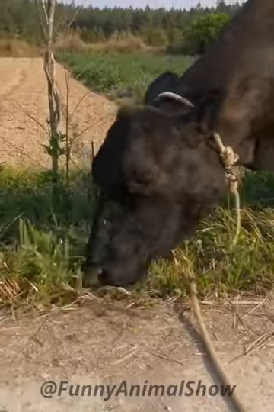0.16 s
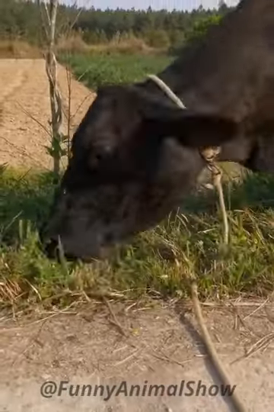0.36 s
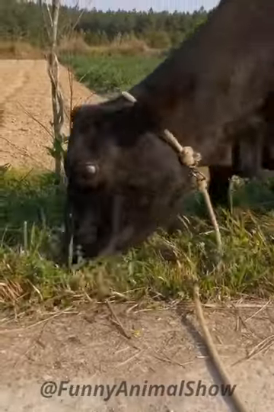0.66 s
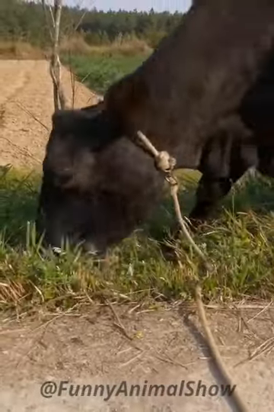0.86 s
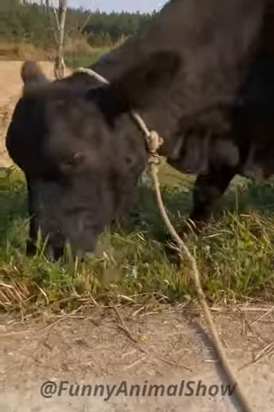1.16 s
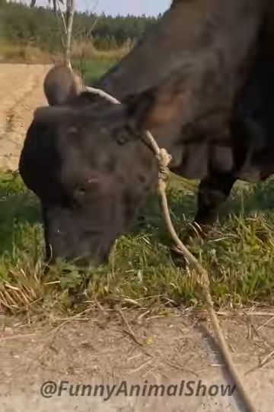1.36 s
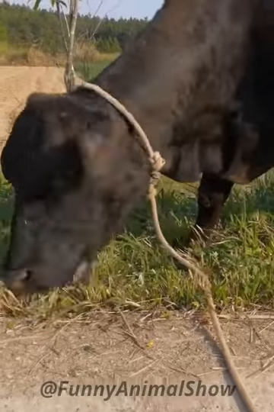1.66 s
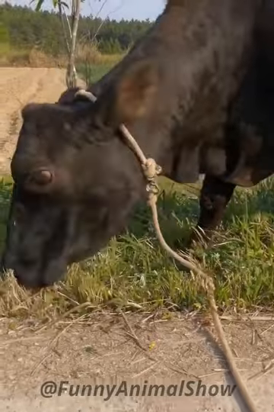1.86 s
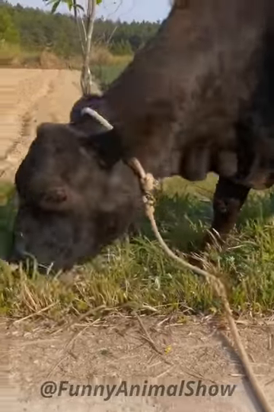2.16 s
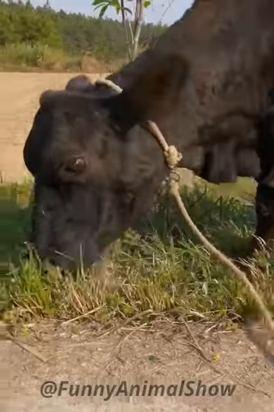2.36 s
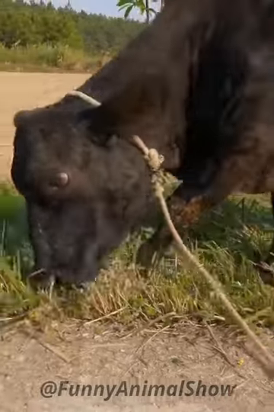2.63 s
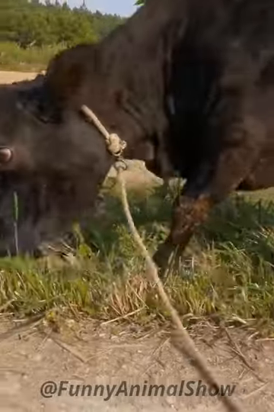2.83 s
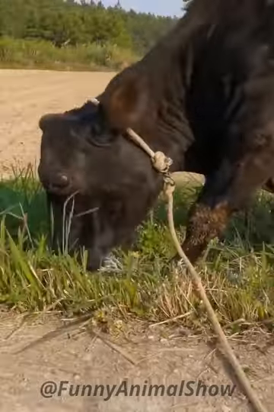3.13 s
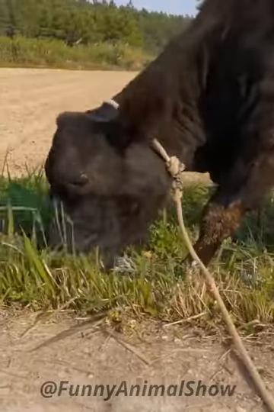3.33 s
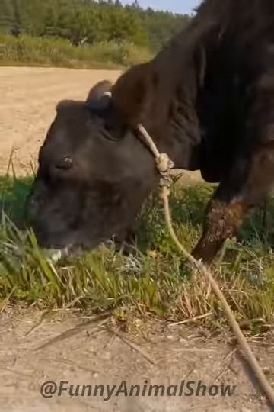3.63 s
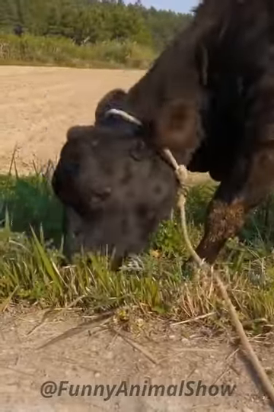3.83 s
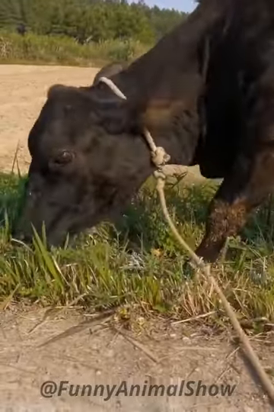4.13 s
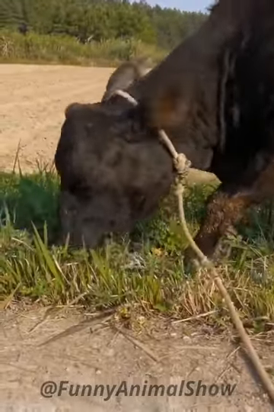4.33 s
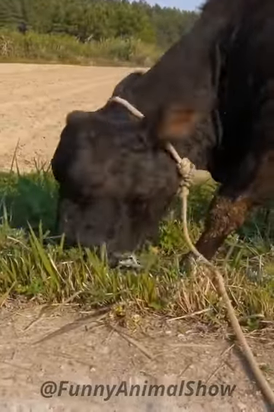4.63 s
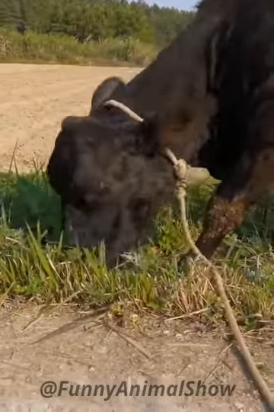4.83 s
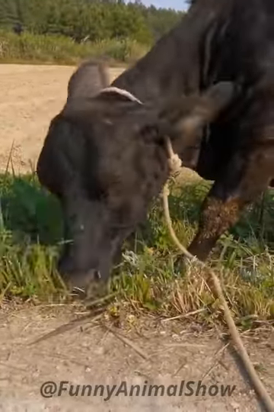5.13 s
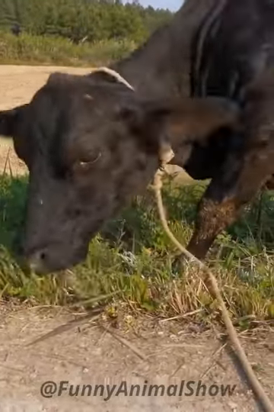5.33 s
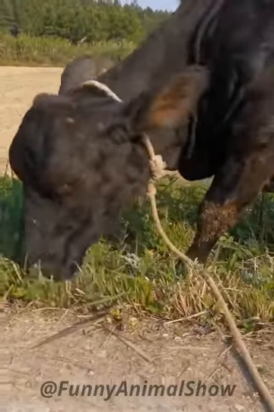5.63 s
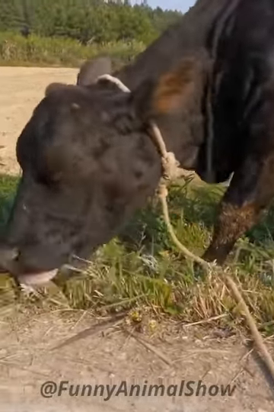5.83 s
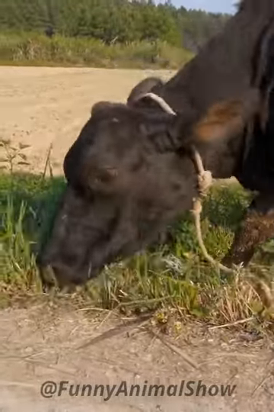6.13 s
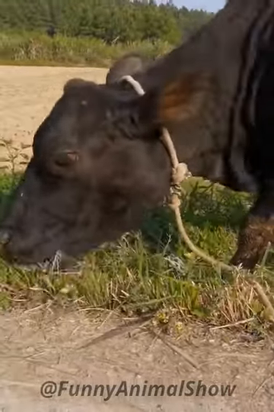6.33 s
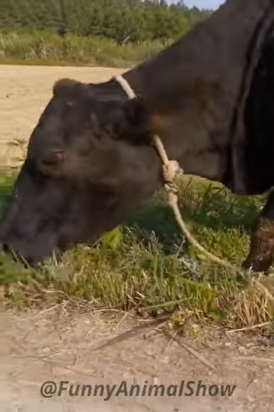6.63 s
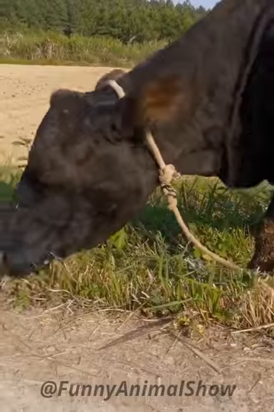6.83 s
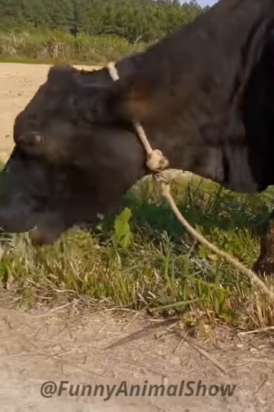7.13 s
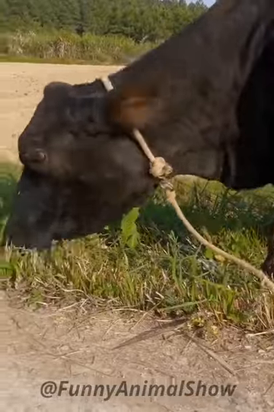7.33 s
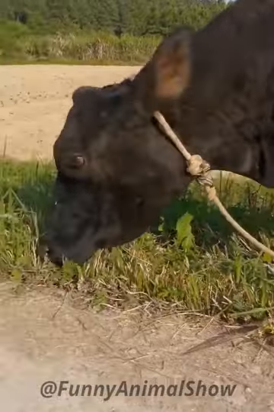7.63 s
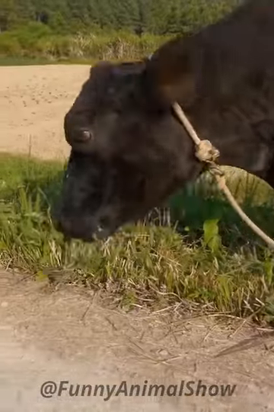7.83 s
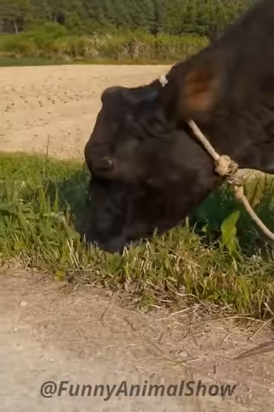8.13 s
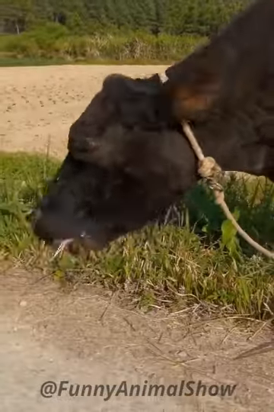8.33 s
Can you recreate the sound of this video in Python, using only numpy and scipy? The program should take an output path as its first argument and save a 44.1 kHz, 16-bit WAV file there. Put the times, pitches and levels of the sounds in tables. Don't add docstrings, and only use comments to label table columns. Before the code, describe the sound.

A cow grazes close by, tearing grass in quick irregular crisp rips, with stems snapping, hollow mouth crunches and soft nostril huffs over a quiet field.

```python
import sys
import numpy as np
from scipy import signal
from scipy.fft import rfft, irfft, next_fast_len
from scipy.io import wavfile
from scipy.ndimage import uniform_filter1d, map_coordinates

SR = 44100
rng = np.random.default_rng(int(sys.argv[2]) if len(sys.argv) > 2 else 0)


def gain_from_db(level_db):
    decades = np.asarray(level_db, float) / 20
    return 10 ** decades


def int16_out(signal):
    q = np.round(np.clip(np.atleast_2d(signal).T, -1, 1) * 32767)
    wavfile.write(sys.argv[1], SR, q.astype(np.int16))


N = 374276

# (time [s], peak level [dB], left-right lean [dB], fibre spray above the peak [dB])
THIN_SNAPS = [(0.417, -23, 23, -20), (0.459, -12.5, 26, -19.5), (0.5, -22.5, 8.5, -8.5),
              (0.829, -33, 28, -29), (0.881, -23, 5, -4.5), (1.2893, -18.5, 23, -17),
              (1.3014, -15, 7.5, -17), (1.67, -17.5, 16, -27), (2.0694, -32, 6, -19),
              (2.0881, -15, 5.5, -14.5), (2.4885, -36, 7.5, -17), (2.8994, -28, 6.5, -9),
              (3.3205, -25, 22, -26), (3.5044, -26.5, 18, -19), (3.9419, -28, 12, -12),
              (4.128, -24, 22, -15), (4.8266, -27, 25, -22), (5.061, -29, 5, -10), (5.1123, -22.5, 13, -16),
              (5.4495, -21, 11, -28), (5.4764, -15, 7.5, -18), (5.89, -24.5, 22, -10.5),
              (6.7757, -36, 8.5, -21), (6.7817, -21.5, 11, -17), (7.164, -32, 11, -17),
              (7.549, -27, 11, -9.5), (7.9139, -30, 6.5, -9), (7.9434, -29, 7, -17), (8, -22, 15, -14),
              (8.358, -25, 5.5, -6)]
# (time [s], peak level [dB], left-right lean [dB], fibre spray above the peak [dB])
THICK_SNAPS = [
    (1.2785, -42, 9, -13),
    (2.056, -29.5, 7, -9),
    (5.025, -24, 2, -24),
    (6.2987, -33, 2, -3),
    (6.752, -33, 4, -17),
    (7.982, -28.5, 5, -10),
]
# (time [s], peak level [dB], pitch [Hz], cycles to die [count])
STALK_CRACKS = [(0.084, -33.5, 482, 7.1), (0.468, -29, 518, 4), (1.273, -32, 290, 2.1),
                (1.281, -35, 790, 4.1), (1.473, -36, 326, 1.5), (1.666, -36, 705, 1.3),
                (2.03, -30.5, 580, 1.5), (2.087, -22, 720, 1.2), (2.896, -30.5, 676, 9.3),
                (3.429, -43, 636, 6.2), (3.584, -46, 378, 2.5), (3.667, -44, 363, 1.3),
                (4.128, -24, 496, 1.6), (4.144, -26.5, 710, 1.5), (4.181, -28, 786, 2.1),
                (5.06, -27, 530, 3.9), (5.318, -38.5, 490, 5), (5.43, -38, 466, 1.8),
                (5.486, -24, 942, 1.2), (5.493, -26, 636, 7.8), (6.332, -34, 620, 1.3),
                (6.374, -29.5, 580, 1.7), (6.751, -27.5, 680, 2.2), (6.7738, -15.5, 600, 1.4),
                (6.781, -31, 600, 1.8), (7.163, -30, 670, 3.5), (7.548, -34.5, 660, 6.3),
                (7.827, -44, 510, 1.3), (7.939, -27, 700, 4.7), (8.364, -32.5, 736, 6.5)]
# (frequency [Hz], density [dB per Hz])
MOUTH_HOLLOW = [(150, -16), (250, 0), (294, -10), (439, -2.5), (725, 2.5), (902, -2), (952, -1),
                (1180, -5.5), (2200, -12.5), (2860, -10), (4840, -120)]
CRACK_DELAY_S = 0.0022
LEFT_RIGHT = np.array([[0.5], [-0.5]])


def unit(x):
    return x / np.sqrt(np.mean(np.mean(np.atleast_2d(x), axis=0) ** 2) + 1e-20)


def along(points, hz):
    f, v = np.transpose(points)
    return np.interp(np.log(hz + 1), np.log(f + 1), v)


def wobble(rate):
    knots = rng.standard_normal(int(N * rate / SR) + 4)
    return map_coordinates(knots, [np.arange(N) * rate / SR])


def noise_pair():
    return rng.standard_normal((2, N))


def filtered(x, response):
    m = next_fast_len(N + 8192)
    return irfft(rfft(x, m) * response(np.fft.rfftfreq(m, 1 / SR)), m)[..., :N]


def shower(rate, spread_db, life_s):
    chance, size = rng.random(N), rng.exponential(size=N)
    breaks = (chance < rate / SR) * gain_from_db(spread_db * np.minimum(size, 3.1))
    bursts = signal.lfilter([1], [1, -np.exp(-1 / (life_s * SR))], breaks)
    return bursts * noise_pair()


def heard(pair, spectrum):
    # (frequency [Hz], left-right likeness [0-1])
    likeness = [(30, 0.034), (60, 0.48), (130, 0.86), (290, 0.81), (640, 0.48), (1400, 0.3), (3000, 0.48),
                (4500, 0), (15000, 0.18)]
    # (frequency [Hz], left-right difference [dB])
    port_colour = [(60, 4), (92, 0), (140, 5), (210, 0), (330, 3.5), (500, 3), (770, 7), (1170, 2.5),
                   (1790, 2), (2740, -2), (4190, 5), (6410, 3), (9810, 17.5), (15000, 15.5)]

    def shared(hz):
        angle = np.arccos(np.clip(along(likeness, hz), 0, 1)) / 2
        return gain_from_db(along(spectrum, hz)) * [np.cos(angle), np.sin(angle)]

    def lean(hz):
        gains = gain_from_db(along(port_colour, hz) * LEFT_RIGHT)
        return gains / np.linalg.norm(gains, axis=0)

    middle, side = filtered(pair, shared)
    return unit(filtered(np.array([middle + side, middle - side]), lean))


def patches(pair, depth_db):
    z = signal.stft(pair, nperseg=512)[2]
    blotches = uniform_filter1d(rng.standard_normal(z.shape[1:]), size=7, axis=0)
    blotches = uniform_filter1d(blotches, size=5, axis=1)
    return signal.istft(z * gain_from_db(depth_db * blotches / blotches.std()), nperseg=512)[1][:, :N]


def steady(x, span_s):
    power = uniform_filter1d(np.mean(x, axis=0) ** 2, size=round(span_s * SR))
    return x / np.sqrt(np.abs(power) + 0.16)


def swells(rows, roundness, steep=0.91, extra=False, longer=0):
    s, db, rise, fall, extra_db = np.transpose(rows)[..., None]
    t = np.arange(0, N + 64, 64) / SR
    away = np.where(t < s, (s - t) / rise, (t - s) / fall)
    drop_db = steep * 20 * away ** (roundness + longer * (rise + fall))
    power = np.sum(gain_from_db(db + extra * extra_db - drop_db) ** 2, axis=0)
    return np.interp(np.arange(N) / SR, t, power) + 1e-12


def mouth(steep=1.0, extra=False):
    # (peak time [s], crackle level [dB], rise [s], fall [s], mouth hollow above the crackle [dB])
    rips = [(0.086, -45, 0.052, 0.064, -6.5), (0.484, -36, 0.064, 0.081, -7.5),
            (0.895, -35.5, 0.071, 0.063, -16), (1.294, -36, 0.035, 0.071, -8),
            (1.487, -44.5, 0.077, 0.1, -10.5), (1.676, -36, 0.049, 0.065, -8.5),
            (2.073, -37.1, 0.067, 0.09, -6.5), (2.494, -40.5, 0.034, 0.12, -11.5),
            (2.903, -38.5, 0.095, 0.099, -8.5), (3.331, -41, 0.039, 0.06, -11),
            (4.173, -42, 0.12, 0.066, -1), (4.674, -44, 0.091, 0.062, -12), (5.032, -40.0, 0.022, 0.18, -4),
            (5.482, -34, 0.067, 0.064, -4), (5.889, -39.5, 0.051, 0.064, -10.5),
            (6.348, -37.5, 0.1, 0.087, -13), (6.774, -37, 0.034, 0.044, -1),
            (7.171, -42, 0.044, 0.077, -10), (7.547, -43.5, 0.032, 0.17, -13),
            (7.958, -36.5, 0.087, 0.094, -4.5), (8.361, -41.7, 0.051, 0.096, -4)]
    # (peak time [s], crackle level [dB], rise [s], fall [s], mouth hollow above the crackle [dB])
    sweeps = [(0.295, -43.5, 0.052, 0.17, -18), (0.681, -44, 0.043, 0.107, -24),
              (0.994, -48.5, 0.36, 0.047, -18), (1.106, -46.5, 0.11, 0.139, -29.1),
              (1.775, -49.5, 0.22, 0.057, -24), (1.902, -48.5, 0.16, 0.09, -13.9),
              (2.306, -52.5, 0.052, 0.29, -45), (2.685, -39, 0.072, 0.19, -26),
              (3.169, -47, 0.11, 0.091, -23), (3.525, -47.5, 0.11, 0.075, -19.5),
              (3.625, -52, 0.049, 0.046, -26.0), (3.88, -44, 0.06, 0.14, -24),
              (3.991, -45.5, 0.13, 0.073, -24), (4.464, -61, 0.028, 0.239, -28),
              (4.836, -48.5, 0.083, 0.13, -25), (5.27, -44.3, 0.075, 0.2, -10),
              (5.57, -51.5, 0.15, 0.12, -17.0), (5.68, -48.5, 0.068, 0.22, -16.5),
              (6.102, -49.5, 0.12, 0.084, -7), (6.578, -55.5, 0.075, 0.23, -16),
              (7.01, -56.5, 0.22, 0.115, -16), (7.367, -50, 0.04, 0.22, -14.5),
              (7.746, -48.5, 0.066, 0.25, -17), (8.13, -54, 0.11, 0.2, -19)]
    ripping = swells(rips, 0.8, steep, extra, longer=3.35)
    return ripping + swells(sweeps, 1.76, steep, extra)


def spray(fade_s, rise_s=0.00099):
    starts, t = np.zeros(N), np.arange(2048) / SR
    for s, db, _, spray_db in THIN_SNAPS + THICK_SNAPS:
        starts[round(s * SR)] = gain_from_db(db + spray_db)
    for s, db, _, _ in STALK_CRACKS:
        starts[round((s + CRACK_DELAY_S) * SR)] += gain_from_db(db - 19.5)
    swell = 1.3 * np.exp(-t / fade_s) * (1 - np.exp(-t / rise_s))
    return np.abs(signal.fftconvolve(starts, swell)[:N])


def tearing():
    # (frequency [Hz], density [dB per Hz])
    fibre_colour = [(760, -18), (1300, -13), (1890, -15), (2840, -5), (3090, -8.5), (4500, -3.5),
                    (5910, -5.5), (6700, -4.5), (8160, -6.5), (9750, 1), (11300, -4), (15000, -7),
                    (15800, -18)]
    # (frequency [Hz], level [dB])
    coarse_colour = [(1200, -5), (2600, -10), (5200, -20.5), (7500, -23), (12000, -53)]
    crackle_db = 10 * np.log10(mouth())
    bite = mouth(steep=1, extra=True)
    coarse_db = np.clip(0.33 * (10 * np.log10(bite) - crackle_db + 22), -8, 8)
    clumps = gain_from_db(0.68 * wobble(45) + 1.07 * wobble(140))

    crisp = np.clip((crackle_db + 47) / 30, 0.15, 0.9)
    rustle = unit(noise_pair())
    ticks = unit(shower(rate=2000, spread_db=0.0, life_s=0.00029))
    fibres = np.sqrt(crisp) * ticks + np.sqrt(1 - crisp) * rustle
    fine = steady(heard(patches(clumps * fibres, depth_db=2.5), fibre_colour), span_s=0.05)
    coarse = filtered(fine, lambda hz: gain_from_db(along(coarse_colour, hz)))
    level = np.hypot(gain_from_db(crackle_db), spray(fade_s=0.006))
    crackle = level * (fine + (gain_from_db(coarse_db) - 1) * coarse)

    stalks = unit(shower(rate=600, spread_db=-0.5, life_s=0.0055)) + 1.13 * unit(noise_pair())
    hollow = steady(heard(patches(clumps * stalks, depth_db=3.0), MOUTH_HOLLOW), span_s=0.054)
    return crackle + np.sqrt(bite) * hollow


def snapping():
    out, t = np.zeros((2, N + 512)), np.arange(512) / SR
    stems = THIN_SNAPS + THICK_SNAPS
    pitches = np.repeat([9820, 2776], [len(THIN_SNAPS), len(THICK_SNAPS)])  # Hz, thin and thick
    pitches = pitches * (1 + 0.067 * rng.standard_normal(len(stems)))
    for (s, db, lean_db, _), hz in zip(stems, pitches):
        shape = (t * hz / 7.1 * np.exp(1 - t * hz / 6.83)) ** 2
        ring = np.sin(2 * np.pi * hz * t) + 0.05 * rng.standard_normal((2, 512))
        gain = gain_from_db(db - 13.5 + LEFT_RIGHT * lean_db)
        out[:, round(s * SR):][:, :512] += gain * shape * ring
    return out[:, :N]


def crushing():
    out, t = np.zeros(N + 1024), np.arange(1024) / SR
    thud = 0.3 * t / 0.004 * np.exp(1 - t / 0.0033) * np.sin(2 * np.pi * 200 * t)
    for s, db, hz, cycles in STALK_CRACKS:
        turns = hz * t + 0.7 * (1 - np.exp(-t / 0.0009))
        crack = np.exp(-hz * t / cycles) * np.sin(2 * np.pi * turns)
        out[round((s + CRACK_DELAY_S) * SR):][:1024] -= gain_from_db(db - 7.0) * (crack + thud)
    return gain_from_db([[2.2], [-2.2]]) * out[:N]


def blowing():
    # (peak time [s], level [dB], rise [s], fall [s], mouth hollow
    # above the blow [dB])
    blows = [(0.38, -61.5, 0.058, 0.22, 2.5), (0.53, -48, 0.086, 0.13, -20), (0.72, -61, 0.13, 0.17, -6),
             (1.065, -68, 0.046, 0.15, -15), (1.28, -47.5, 0.047, 0.058, -7),
             (1.38, -49.5, 0.1, 0.083, -20), (1.49, -46.5, 0.041, 0.032, -22), (2.2, -56, 0.058, 0.18, -26),
             (2.39, -54.5, .16, 0.14, -10), (2.75, -63.5, .1, 0.2, 3.5), (3.3, -47, 0.15, 0.085, -8),
             (3.44, -61.5, 0.044, 0.067, -6), (3.67, -61.5, .2, 0.18, -12), (4.03, -49.5, 0.17, .2, -6),
             (4.66, -62.5, 0.16, 0.14, -2), (5.06, -45.5, 0.11, 0.26, -11),
             (5.98, -45.5, 0.085, 0.11, -13.5), (6.14, -49.5, 0.13, 0.13, -9.5),
             (6.38, -47.5, 0.02, 0.024, -4.5), (6.69, -66, 0.066, .04, 0), (6.93, -57, 0.068, 0.46, -8.5),
             (7.85, -44, 0.083, 0.21, -8), (8.46, -64, 0.026, .05, -14)]
    # (frequency [Hz], density [dB per Hz])
    nostril_colour = [(24, -44), (40, -0.5), (59, -8), (102, 0.5), (204, -2.5), (339, -10), (507, -8.5),
                      (900, -24.5), (1170, -56), (1980, -120)]
    roundness = 2.22
    jaw = gain_from_db(-6.5) ** 2 * mouth(steep=0.96, extra=True)
    level = np.sqrt(swells(blows, roundness) + jaw)
    hollow_level = np.sqrt(swells(blows, roundness, extra=True))
    air = patches(noise_pair(), depth_db=3.5)
    hollow = steady(heard(air[:, ::-1], MOUTH_HOLLOW), span_s=0.044)
    breath = steady(heard(air, nostril_colour), span_s=0.0383)
    return hollow_level * hollow + gain_from_db(1) * level * breath


def open_field():
    # (frequency [Hz], density [dB per Hz])
    field_colour = [(15, -55), (25, 11.5), (176, -8.5), (335, -10.5), (900, -9), (2020, -17.5), (2630, -14),
                    (8100, -16.5), (10000, -12), (15000, -16.5)]
    level = gain_from_db(-63.0 + 1.1 * wobble(2.08))
    return level * heard(patches(noise_pair(), depth_db=4.0), field_colour)


def scene():
    return tearing() + snapping() + crushing() + blowing() + open_field()


def low_pass(x):
    return signal.sosfilt(signal.butter(12, 15910, fs=SR, output="sos"), x)


def record(dry):
    mix = filtered(dry, lambda hz: hz < 15750)
    return low_pass(mix)


dry = scene()
out = record(dry)
int16_out(out)
```